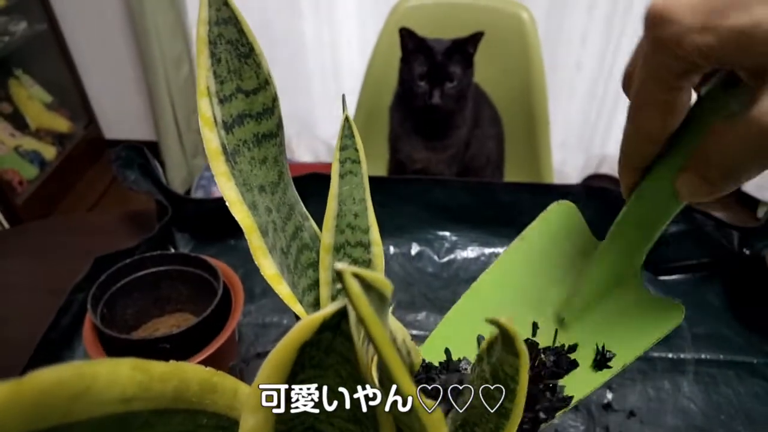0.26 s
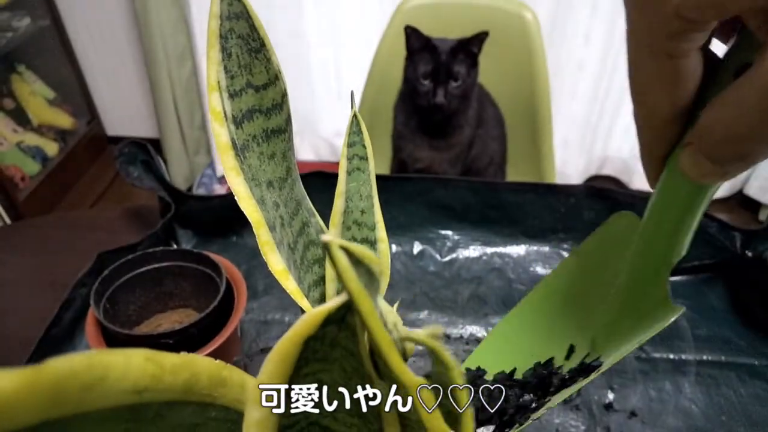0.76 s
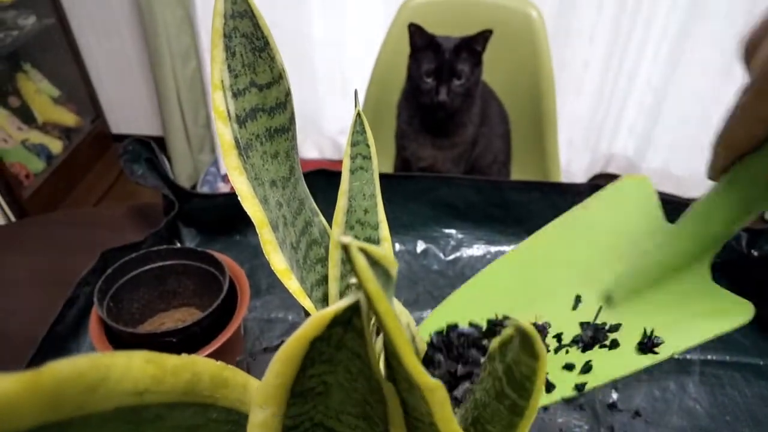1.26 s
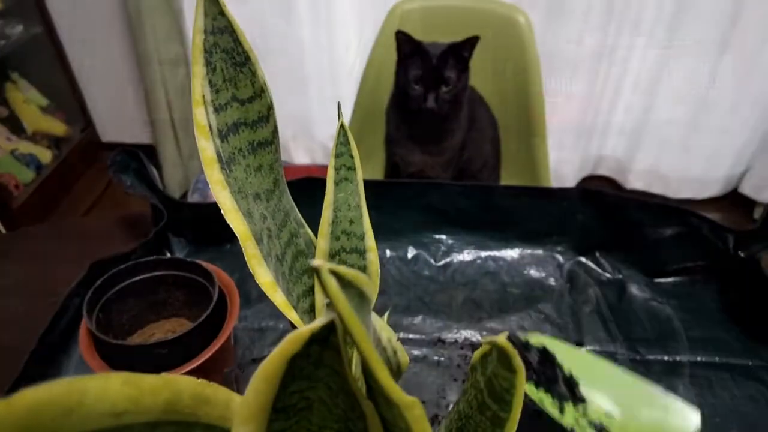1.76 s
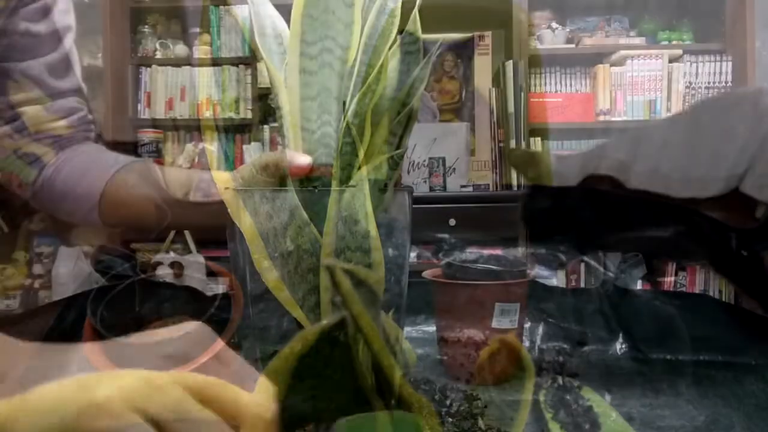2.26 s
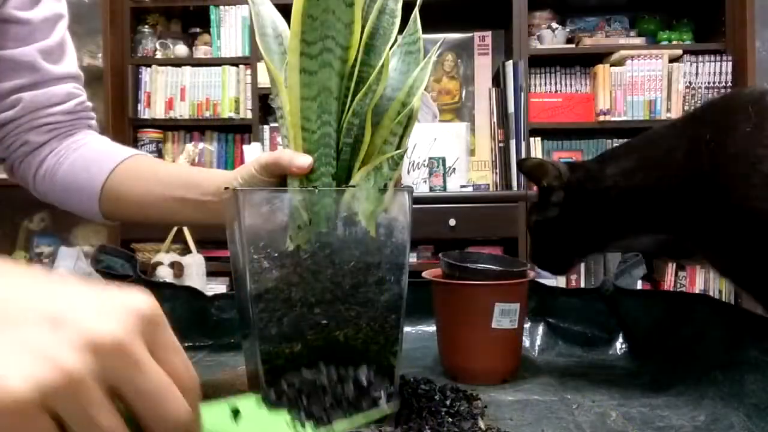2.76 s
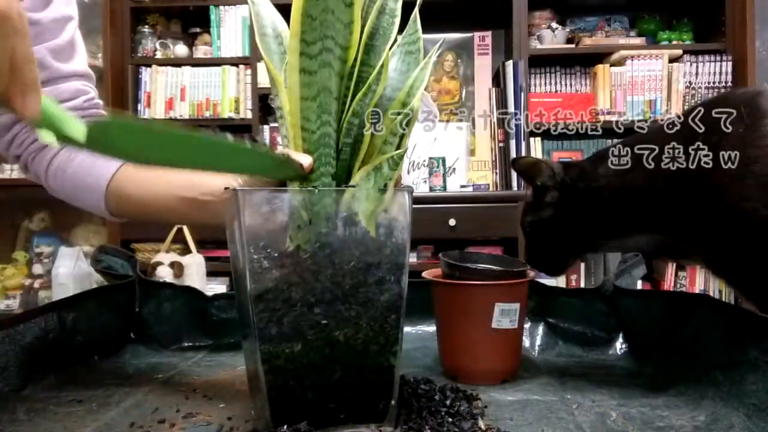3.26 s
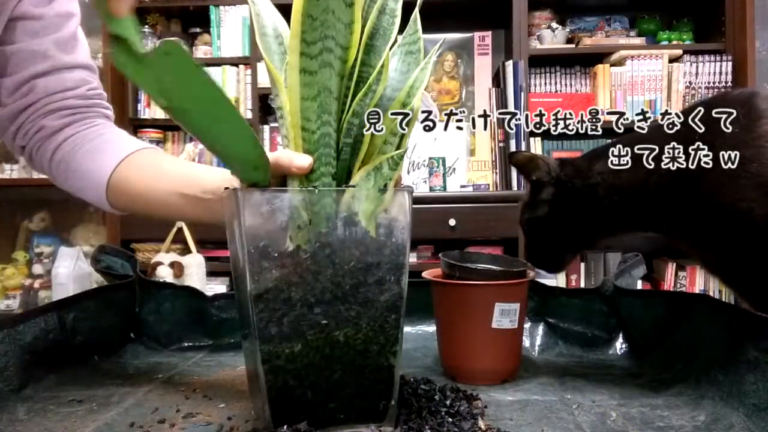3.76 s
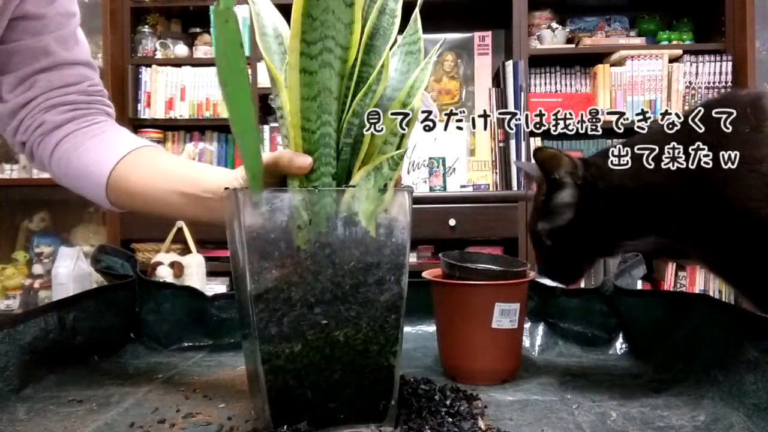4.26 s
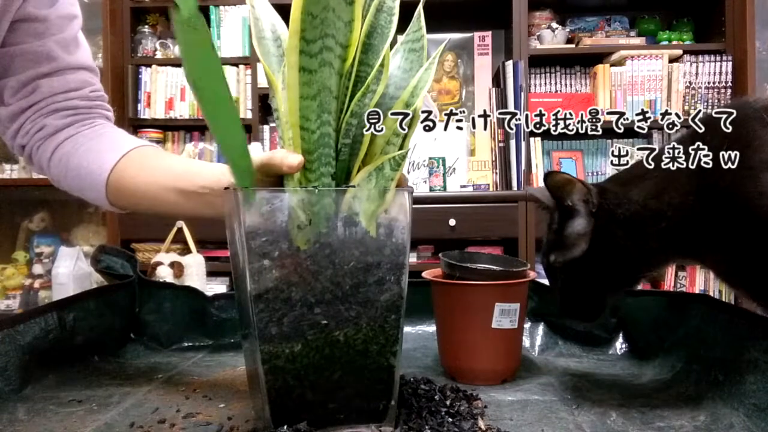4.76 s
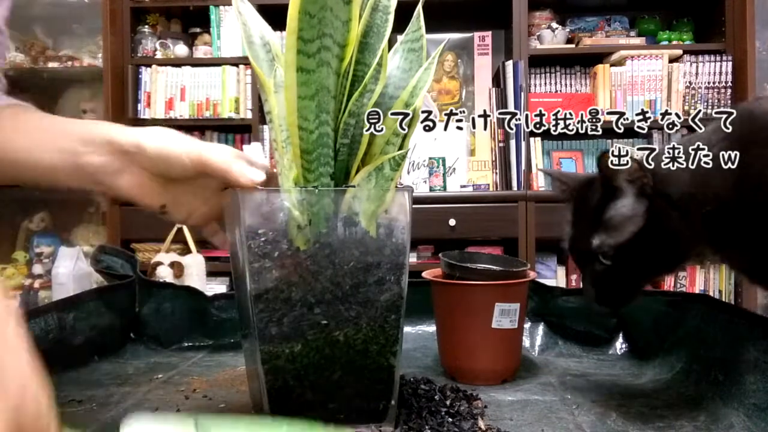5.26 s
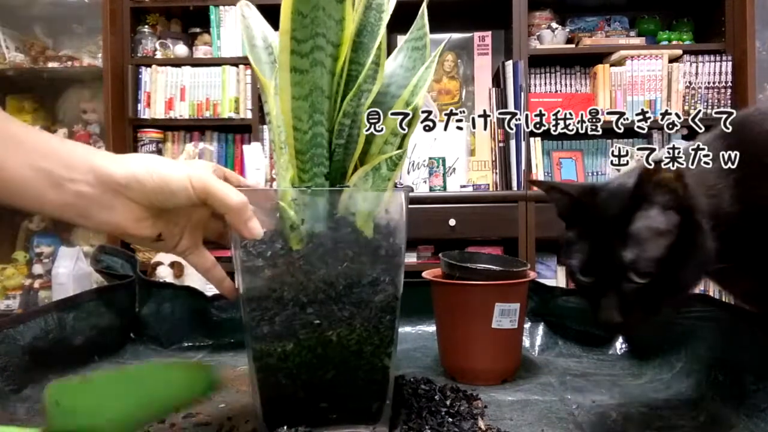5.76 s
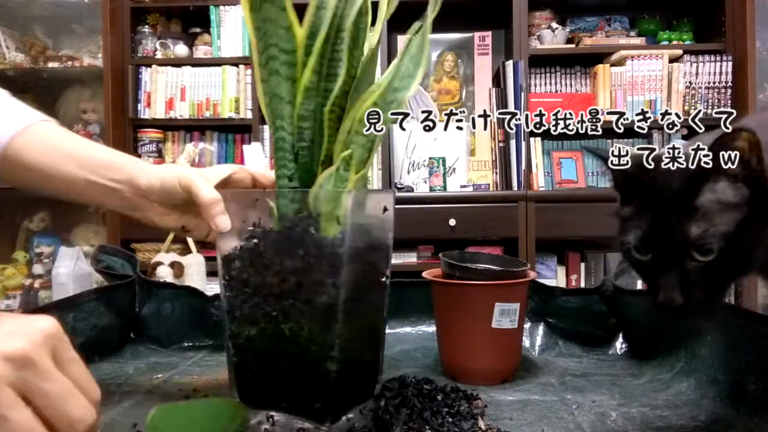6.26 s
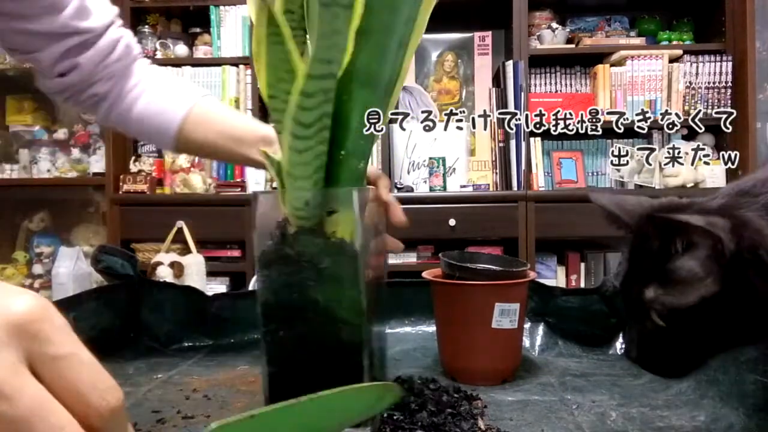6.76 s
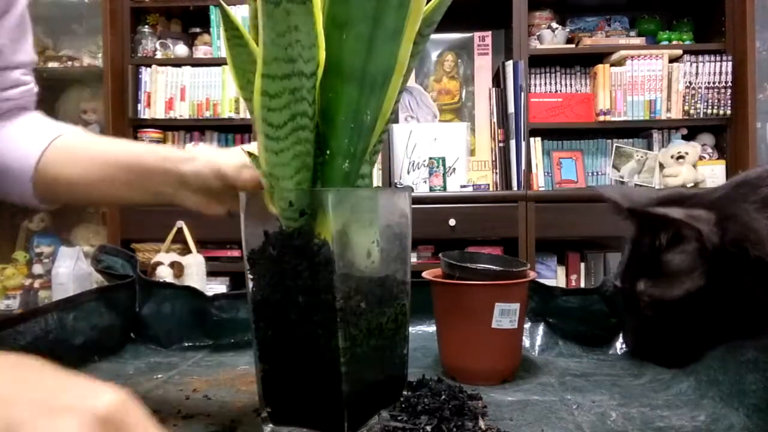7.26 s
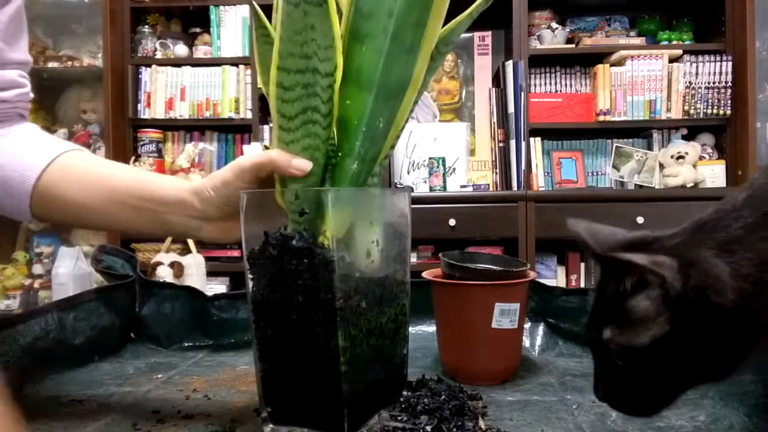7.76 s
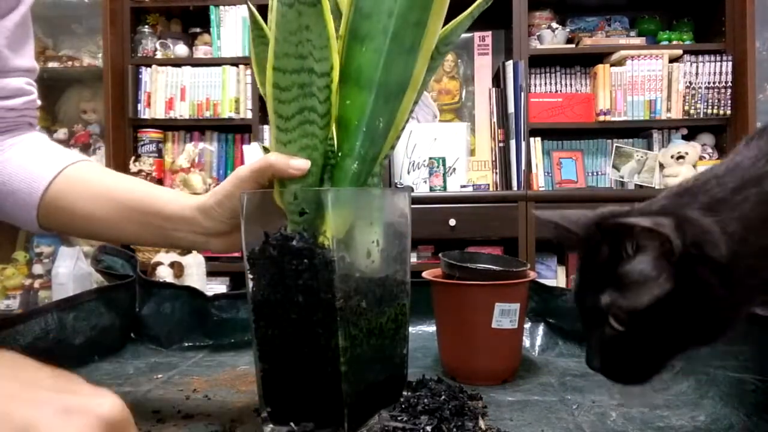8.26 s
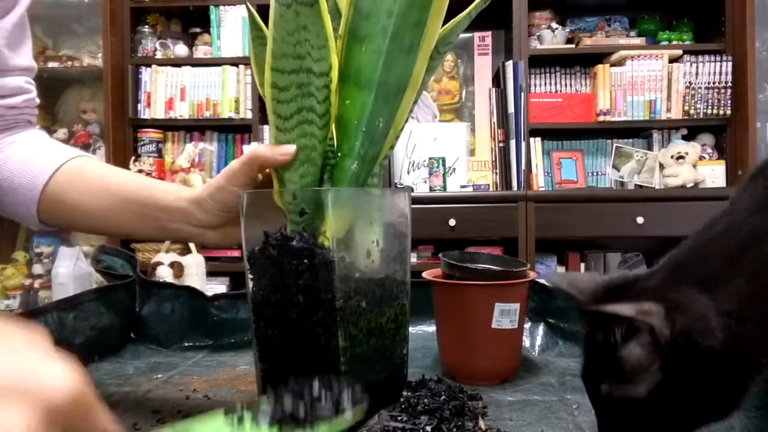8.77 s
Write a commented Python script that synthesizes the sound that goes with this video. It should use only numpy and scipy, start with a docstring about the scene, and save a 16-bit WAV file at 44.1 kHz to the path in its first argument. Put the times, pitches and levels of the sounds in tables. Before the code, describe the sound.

Crunchy soil scooping gives way to hollow pot knocks, a clear trowel tap, a short plastic squeak and gritty scraping over a faint low hum.

```python
"""Gritty potting soil grinds along a trowel scooping it off a plastic sheet into a tall plastic pot.
The blade is tapped clean and rings; the pot knocks down, turns with a squeak and slides over spilt grains.
Soil is a crowd of tiny ringing grains, blows are noise cracks with modal thuds, and gliding tones with
overtones make the groans and squeaks of plastic and a thin ring of the pot wall.
Behind it lie the air of a small quiet room, its short echo and a low wavering appliance hum."""
import sys
import numpy as np
from scipy import signal
from scipy.fft import rfft, irfft
from scipy.io import wavfile

SR = 44100
rng = np.random.default_rng(int(sys.argv[2]) if len(sys.argv) > 2 else 0)


def to_wav(s):
    """Save 16-bit WAV."""
    ch = np.atleast_2d(s).T  # columns
    pcm = np.round(np.clip(ch, -1, 1) * 32767)  # PCM
    wavfile.write(sys.argv[1], SR, pcm.astype(np.int16))


N = 397782
TIME = np.arange(N) / SR
EDGE_HZ = 14500  # upper edge of the recorder's band

# Colour of soil grinding on the blade: (frequency [Hz], relative level [dB])
SOIL_COLOUR = [(90, -6), (180, 5.5), (500, -0.5), (900, -12), (1300, 2), (2000, 2), (3500, 0.5), (5000, 0),
               (7400, -5), (9400, -12.5), (13600, -8), (14500, -37)]
# Colour of grit hissing under the pot: (frequency [Hz], relative level [dB])
HISS_COLOUR = [(590, -53.5), (1000, 0.5), (1500, -2.5), (1910, -0.5), (3100, -2), (4140, 2), (7250, -2),
               (9370, -7), (13400, -4), (14500, -22)]
# Colour of the pot wall's drone: (frequency [Hz], relative level [dB])
DRONE_COLOUR = [(90, -63.5), (160, 9), (250, -16), (350, -6), (480, -0.5), (620, -6), (900, -7.5),
                (1300, -0.5), (2400, -20.5)]
# Colour of the crack in a blow: (frequency [Hz], relative level [dB])
CRACK_COLOUR = [(100, -18), (300, 8.5), (900, 3), (1600, 3), (4200, -0.5), (6500, -3.5), (9500, -10),
                (14000, -6)]
# Colour of the blade scraping the wall: (frequency [Hz], relative level [dB])
SCRAPE_COLOUR = [(90, -13), (170, 16), (300, 4.5), (600, -6), (1000, -4), (2300, -4), (4000, -7.5),
                 (6500, -10.5), (9500, -17.5), (13500, -9.5), (14500, -30)]
# Colour of the room air: (frequency [Hz], relative level [dB])
AIR_COLOUR = [(20, -13), (29, -10), (40, -3.5), (75, 1), (125, -3), (200, -6), (400, -15), (700, -18),
              (2000, -23), (4000, -29), (8000, -34.5), (14000, -33)]
AIR_DB = -54.5  # rms
# Steady lines of the appliance: (frequency [Hz], rms level [dB], unsteadiness [share])
HUM_LINES = [(120.2, -50.5, 0.42), (172.6, -66.5, 0.057), (536, -70.5, 0.32)]
# Decay of the room: (frequency [Hz], t60 [s])
ROOM_DECAY = [(120, 0.35), (400, 0.33), (2000, 0.35), (6000, 0.28), (14000, 0.36)]

# Sharp resonances the grains excite in the blade: (frequency [Hz], width [Hz], gain [dB])
BLADE_RESONANCES = [(918, 95, 20), (3280, 190, -19), (4000, 160, 4.5), (5760, 80, -8), (7130, 85, 7),
                    (7440, 83, 4), (10540, 140, 9.5), (11960, 53, 15), (13400, 160, 10)]
# Sharp resonances of the pot's wall: (frequency [Hz], width [Hz], gain [dB])
WALL_RESONANCES = [(880, 89, 11.2), (1128, 52, 3.4), (1505, 45, 6), (2395, 91, 3.7), (2320, 44, 1.2),
                   (2660, 40, 6), (4100, 120, 3.4), (4500, 170, 3.9), (4780, 70, 5.5), (6140, 77, 2.9),
                   (7400, 61, 5.7), (7590, 22, 18)]
# Resonances of blade and wall pressed together: (frequency [Hz], width [Hz], gain [dB])
SCRAPE_RESONANCES = [(915, 25, 16.5), (1590, 50, 8), (2320, 70, 11.5), (3830, 160, 12), (4078, 54, 15.5),
                     (4720, 99, 9), (6020, 58, 15), (6630, 40, 12), (6930, 74, 12)]
# Modes of the filled pot on the table: (frequency [Hz], relative level [dB], t60 [s])
POT_MODES = [(152, -8.5, 0.077), (159.3, 5, 0.11), (218, -8.5, 0.17), (255.6, 6, 0.083), (314.4, 6, 0.045),
             (343.3, -7, 0.042), (430.6, -2.5, 0.13), (551.4, 8.5, 0.046), (698, 8.5, 0.059)]
# Modes of the trowel: (frequency [Hz], relative level [dB], t60 [s])
BLADE_MODES = [(901, -38, 0.36), (1120, -33, 0.26), (1432, -31.5, 1.22), (1599, -41.5, .25),
               (2048, -32, 0.51), (2280, -36, 0.11), (2320, -18, 0.028), (2490, -43, 0.18),
               (2830, -47, 0.092), (2910, -25.5, 0.027), (3360, -25.5, 0.024), (3850, -29, 0.043),
               (6300, -37, 0.17), (7940, -43, 0.23)]

# Groans and squeaks of slipping plastic, with the pot wall's thin ring near 4 kHz and the octave of
# the groan: (start [s], rise [s], hold [s], release [s], pitch [Hz], level [dB])
PLASTIC_TONES = [(6.226, 0.012, 0.056, 0.1, 4020, -53), (6.301, 0.015, 0.019, 0.073, 442, -34),
                 (6.309, 0.0086, .003, 0.035, 845, -36.5), (6.331, .044, 0.033, 0.027, 1472, -26.5),
                 (6.345, .02, .025, .02, 2440, -44), (6.465, 0.0214, .005, .015, 1487, -50),
                 (8.03, 0.0087, 0.12, 0.047, 352, -45.5), (8.19, 0.049, 0.14, .04, 528, -47),
                 (8.449, 0.029, .008, 0.027, 439, -43.5)]
# Overtones of these tones: (multiple of the pitch, relative level [dB])
PLASTIC_OVERTONES = [(2, -12.5), (3.05, -18.5), (4, -15), (5, -32), (5.4, -19), (6.1, -39), (7.5, -42)]
PITCH_SAG = 0.0121  # a tone goes flat by up to this share as it slackens
# Taps of the trowel; where it is struck decides which modes speak:
# (time [s], relative level [dB], favoured frequency [Hz])
BLADE_TAPS = [(4.05, -23.5, 1070), (4.2247, -18.5, 2720), (4.8101, 3.5, 2170)]
# Blows on pot and table: (time [s], crack level [dB], crack decay [s], brightness [dB/octave],
# thud level [dB], thud centre [Hz])
BLOWS = [(0.719, -20.5, 0.0043, 9.5, -35.5, 400), (2.036, -34, 0.013, 1, -48, 300),
         (2.051, -27, .0076, 0.5, -3, 284), (2.079, -32, .0085, -10, -19, 250),
         (2.1737, -27, 0.0048, -2, -18, 300), (2.291, -33.5, 0.0081, -1.5, -27, 364),
         (2.439, -47.5, .0055, -7, -25.5, 318), (4.051, -48, 0.045, 4.5, -34, 231),
         (4.083, -41, 0.019, -1, -53.5, 240), (4.4878, -21.5, 0.0057, -1.5, -14, 320),
         (4.548, -56, 0.017, -4, -20, 165), (4.636, -40, 0.011, -1, -38, 220),
         (4.8111, -38, .008, 0, -29, 213), (5.9203, -37.5, 0.012, -2.5, -29, 372),
         (6.089, -41, 0.013, -1, -34, 400), (6.224, -25, .0049, 1, -36, 430),
         (6.243, -30, 0.015, -1, -47, 300), (6.643, -41.5, 0.012, -1.5, -40, 440),
         (6.7884, -31, 0.0062, -4.5, -23.5, 280), (6.871, -33, 0.0057, -10, -40, 380),
         (6.921, -33, 0.0053, -2.5, -23.5, 394), (6.985, -26, 0.01, -4, -25.5, 400),
         (7.004, -44, 0.014, -6, -25, 137), (7.4566, -31.5, 0.0048, -6, -33, 427),
         (8.033, -38.5, 0.011, 2, -30, 357), (8.126, -59, .005, -10, -26.5, 304),
         (8.3358, -14, .008, -2.5, -9.5, 275), (8.345, -21.5, 0.0041, -1, -13, 173),
         (8.438, -34.5, 0.0055, 2, -13, 355), (8.568, -35.5, .005, -11, -32, 340)]
# Largest crumbs snapping or landing on blade and sheet: (time [s], starting rms level [dB], pitch [Hz])
BIG_CRUMBS = [(0.087, -40, 2580), (0.165, -48, 885), (0.507, -33, 3540), (0.563, -33, 3470),
              (0.662, -40, 3220), (0.728, -39.5, 494), (0.812, -40, 795), (0.925, -39.5, 880),
              (1.067, -28.5, 3260), (1.099, -30, 3430), (1.16, -31, 3820), (1.19, -32.5, 3200),
              (1.394, -38, 3640), (1.457, -39, 3680), (1.525, -38, 3080), (1.809, -47.5, 3480),
              (2.933, -43, 4580), (3.09, -43, 4350), (3.239, -35.5, 5850), (3.277, -36.5, 10500),
              (4.067, -37, 5000), (4.223, -41.5, 3730), (4.26, -40.5, 2450), (7.414, -50, 1770),
              (8.417, -31.5, 6860), (8.548, -48.5, 2340), (8.648, -46, 5070), (8.874, -38.5, 4830),
              (8.887, -47.5, 1230), (8.953, -39.5, 4240)]
CRUMB_CYCLES = 12.6  # cycles to fall to 1/e, so low crumbs last longer
# Blade pushed down along the inside of the pot: (start [s], rise [s], hold [s], release [s], level [dB])
SCRAPE_PUSHES = [(3.878, 0.051, 0.14, .02, -63.5), (4.04, .015, 0.024, 0.12, -48.5),
                 (4.496, .003, 0.043, 0.04, -33)]
# Pot sliding on the gritty sheet: (start [s], rise [s], hold [s], release [s],
# relative grit hiss level [dB], relative wall drone level [dB], drone centre [Hz])
SLIDES = [(2.039, .005, 0.064, 0.22, -45.5, -46, 286), (2.265, 0.016, 0.14, 0.13, -41.5, -41.5, 385),
          (2.551, .03, 0.084, 0.017, -51.5, -63, 397), (2.684, 0.16, 0.06, 0.072, -47.5, -65, 450),
          (6.08, 0.041, 0.015, 0.032, -51, -39.5, 393), (6.225, 0.0083, 0.058, 0.039, -36.5, -32.5, 450),
          (6.333, 0.031, 0.051, 0.038, -37.5, -48.5, 457), (6.474, 0.016, 0.024, 0.062, -45.5, -58, 497),
          (6.631, 0.015, .13, 0.036, -51, -50, 463), (6.769, 0.012, 0.27, 0.021, -50, -42, 294),
          (7.992, 0.0033, .02, .03, -47, -68, 400), (8.026, 0.006, 0.1, 0.037, -43, -48, 390),
          (8.097, 0.085, 0.11, 0.094, -40, -41, 400)]
DRONE_FOCUS_DB = 3.5  # loss one octave from the drone's centre, growing as octaves squared
# Pushes of the trowel, soil moving on the blade:
# (start [s], rise [s], hold [s], release [s], relative level [dB], added fizz [dB])
SCOOP_PUSHES = [(0.0, 0.0017, 0.0088, 0.34, -48, -7), (0.23, .11, 0.44, 0.09, -39.5, -1),
                (0.845, 0.081, 0.25, 0.26, -41, 1), (2.525, 0.087, .025, .012, -59.5, 19),
                (3.006, 0.13, .25, 0.027, -55, -7), (7.373, 0.047, 0.23, 0.048, -55, -35),
                (8.51, 0.03, 0.22, 0.061, -46.5, -2), (8.832, .02, 0.12, 0.053, -48.5, -7)]


def amp(db):
    """Decibels to gain."""
    return 10 ** (np.asarray(db) / 20)


def unit(x):
    """Scales to rms 1."""
    return x / np.sqrt(np.mean(x ** 2) + 1e-20)


def read(points, hz):
    """Reads a table along log frequency."""
    f, value = np.transpose(points)
    return np.interp(np.log(hz + 1), np.log(f), value)


def add(mix, s, sound):
    """Mixes a sound in at time s."""
    part = mix[max(round(s * SR), 0):][:len(sound)]
    part += sound[:len(part)]


def colour(x, db_at):
    """Causal minimum-phase filter whose gain in dB is a function of frequency."""
    hz = abs(np.fft.fftfreq(4096, 1 / SR))
    log_gain = np.log(amp(np.maximum(db_at(hz), -100)))
    taps = np.fft.ifft(np.exp(np.conj(signal.hilbert(log_gain)))).real
    return signal.fftconvolve(x, taps)[:len(x)]


def peaks_db(peaks, hz):
    """The gain of a set of narrow resonances."""
    return sum(db / (1 + (2 * (hz - f) / width) ** 2) for f, width, db in peaks)


def waver(rate_hz):
    """Slow random motion of rms 1."""
    hz = np.fft.rfftfreq(N, 1 / SR)
    return unit(irfft(rfft(rng.standard_normal(N)) / (1 + (hz / rate_hz) ** 4), N))


def swell(start, rise, hold, release):
    """One push of the hand: it builds, holds and dies away exponentially."""
    t = TIME - start
    build = np.clip(t / max(rise, 1e-3), 0, 1)
    return build * np.exp(-np.clip((t - rise - hold) / max(release, 1e-3), 0, 20))


def joined(gains):
    """Overlapping pushes add in power."""
    return np.sqrt(sum(gain ** 2 for gain in gains))


def clicks(per_s, spread_db):
    """Random contacts of either sign, their sizes spread exponentially in dB."""
    hit = np.flatnonzero(rng.random(N) < per_s / SR)
    sign, size = rng.choice([-1., 1.], N), rng.exponential(1, N)
    out = np.zeros(N)
    out[hit] = sign[hit] * amp(spread_db * np.minimum(size[hit], 4))
    return unit(out)


def grains(per_s, spread_db, cycles, clump_db, sharp, patch_db=5.0, count=18):
    """Crumbs of all sizes each ring a few cycles, among sharp fractures; they give way in clumps."""
    t, rings = np.arange(600) / SR, np.zeros(N)
    moments = np.arange(0, N / SR, .015)
    for hz in np.geomspace(400, 14000, count):
        ring = np.sin(2 * np.pi * hz * t) * np.exp(-hz * t / cycles)
        # each size comes and goes
        patches = np.interp(TIME, moments, amp(patch_db * rng.standard_normal(len(moments))))
        contacts = patches * clicks(per_s / count, spread_db)
        rings += np.sqrt(hz) * unit(signal.oaconvolve(contacts, ring)[:N])
    fractures = sharp * clicks(per_s / 2, spread_db)
    return (unit(rings) + fractures) * amp(clump_db * waver(50))


def crumb(hz, skirt_db=3.0, narrow=5.1):
    """A crumb breaks in a short crackle around its own pitch."""
    t = np.arange(SR // 6) / SR
    noise = rng.standard_normal(len(t))
    crackle = colour(noise, lambda f: -skirt_db * np.log2(1 + (narrow * np.log2((f + 1) / hz)) ** 2))
    return unit(crackle) * np.exp(-t * hz / CRUMB_CYCLES)


def background():
    """Coloured noise for room air, and appliance lines that waver in strength and phase."""
    bed = amp(AIR_DB) * unit(colour(rng.standard_normal(N), lambda hz: read(AIR_COLOUR, hz)))
    for hz, db, unsteady in HUM_LINES:
        swing = 1 + unsteady * (waver(11) + 1j * waver(14))
        bed += amp(db) * unit((swing * np.exp(2j * np.pi * hz * TIME)).real)
    return bed


def room(x):
    """Dense reflections from table and shelves, each band dying at its own speed."""
    size = SR // 2
    present = (rng.random(size) < 3000 / SR) * (TIME[:size] > .004)
    taps = rng.choice([-1., 1.], size) * present
    hz, t, bands = signal.stft(taps, SR, nperseg=256)
    fade = amp(-60 * t / read(ROOM_DECAY, hz)[:, None])
    tail = signal.istft(bands * fade, SR, nperseg=256)[1]
    return signal.fftconvolve(x, tail / np.linalg.norm(tail))[:N]


def plastic_tones(jitter=0.0067, flutter_db=2.14, rasp_db=-16, firm_db=-26, edge=0.39):
    """Uneven groans, squeaks and wall ring; a louder tone has more rasp and wall-coloured overtones."""
    out, drift, flutter = np.zeros(N), 1 + jitter * waver(280), flutter_db * waver(150)
    noise = rng.standard_normal(N)
    rasp = unit(colour(noise, lambda hz: read(HISS_COLOUR, hz) + peaks_db(WALL_RESONANCES, hz)))
    rasp *= amp(rasp_db)
    for *shape, hz, db in PLASTIC_TONES:
        grip = swell(*shape) ** 2  # a tone grows as the square of the push
        on = grip > .005
        level_db = db + 20 * np.log10(grip[on])
        pitch = hz * (1 - PITCH_SAG * (1 - grip[on])) * drift[on]
        phase = 2 * np.pi * np.cumsum(pitch) / SR
        overtones = sum(amp(tone_db + peaks_db(WALL_RESONANCES, k * hz)) * np.sin(k * phase)
                        for k, tone_db in PLASTIC_OVERTONES if k * hz < EDGE_HZ)
        firmness = amp(edge * (level_db - firm_db))
        tone = np.sin(phase) + firmness * (overtones + rasp[on] * (1 + np.cos(phase)))
        out[on] += np.sqrt(2) * tone * amp(level_db + flutter[on])
    return out


def trowel(spread_db=5, hold_s=.22, muffle_db=12):
    """The tapped blade's modes ring until the hand muffles them; returns the ring and its attack."""
    ring, attack, t = np.zeros(N), np.zeros(N), np.arange(SR) / SR
    hz, mode_db, t60 = np.transpose(BLADE_MODES)[:, :, None]
    muffled_db = muffle_db * np.clip((t - hold_s) / 0.091, 0, 1)
    for s, db, favoured_hz in BLADE_TAPS:
        level_db = db + mode_db - spread_db * np.log2(hz / favoured_hz) ** 2
        modes = amp(level_db - 60 * t / t60 - muffled_db) * np.sin(2 * np.pi * hz * t)
        note = modes.sum(0)
        add(ring, s, note)
        add(attack, s, note * np.exp(-t / 0.0015))
    return ring, attack


def knocks():
    """Each blow is a gritty crack and a thud; softer contact favours the pot's lower modes."""
    cracks, thuds, t = np.zeros(N), np.zeros(N), np.arange(SR // 3) / SR
    hz, mode_db, t60 = np.transpose(POT_MODES)[:, :, None]
    for s, crack_db, decay, bright, thud_db, centre_hz in BLOWS:
        def crack_colour(f):
            tilt_db = bright * np.log2((f + 300) / 2000)
            return read(CRACK_COLOUR, f) + peaks_db(WALL_RESONANCES, f) + tilt_db
        crack = unit(colour(rng.standard_normal(len(t)), crack_colour))
        add(cracks, s, amp(crack_db) * crack * np.exp(-t / max(decay, 1e-4)))
        weight = amp(mode_db - 11.6 * np.log2(hz / centre_hz) ** 2)
        modes = weight * amp(-60 * t / t60) * np.sin(2 * np.pi * hz * t)
        thud = modes.sum(0) / np.linalg.norm(weight)
        add(thuds, s, amp(thud_db) * thud * (1 - np.exp(-t / 0.0032)))  # soft onset
    return cracks, thuds


def crumbs():
    """The large crumbs that stand out from the grit, each a short pitched crackle."""
    out = np.zeros(N)
    for s, db, hz in BIG_CRUMBS:
        add(out, s, amp(db) * crumb(hz))
    return out


def scraping():
    """Grit trapped between blade and wall rasps and sets both ringing."""
    grit = grains(per_s=6300, spread_db=3.5, cycles=0.95, clump_db=1.0, sharp=1.0, patch_db=3.5, count=8)
    rasp = unit(colour(grit, lambda hz: read(SCRAPE_COLOUR, hz) + peaks_db(SCRAPE_RESONANCES, hz)))
    return rasp * joined(amp(db) * swell(*shape) for *shape, db in SCRAPE_PUSHES)


def sliding(hiss_db=-4.5, drone_db=-3):
    """Grains crush against the pot, and its judder sets the wall droning."""
    grit = grains(per_s=6000, spread_db=-4.0, cycles=1.75, clump_db=1.0, sharp=0.75)
    hiss = unit(colour(grit, lambda hz: read(HISS_COLOUR, hz) + peaks_db(WALL_RESONANCES, hz)))
    body_peaks = [(hz, 3.3 / t60, 6) for hz, db, t60 in POT_MODES]  # faster decay, wider peak
    judder = clicks(per_s=700, spread_db=3.5)
    wall = colour(judder, lambda hz: read(DRONE_COLOUR, hz) + peaks_db(body_peaks, hz))
    drone, hiss_gains = np.zeros(N), []
    for *shape, grit_db, wall_db, centre_hz in SLIDES:
        push = swell(*shape)
        voiced = unit(colour(wall, lambda hz: -DRONE_FOCUS_DB * np.log2((hz + 1) / centre_hz) ** 2))
        drone += amp(wall_db + drone_db) * push * voiced
        hiss_gains.append(amp(grit_db + hiss_db) * push)
    return hiss * joined(hiss_gains) + drone


def scooping(coarse_db=-7.5, fizz_db=-2.0, fizz_power=1.7, lump_db=-13.0, lump_hz=3300,
             pellet_db=-19.5, pellet_hz=800):
    """Soil grinds along the blade; a firm push adds fizz, stray lumps snap and pellets knock."""
    grit = grains(per_s=3000, spread_db=-2.5, cycles=2.5, clump_db=3.0, sharp=0.98, count=24)
    grit = unit(colour(grit, lambda hz: read(SOIL_COLOUR, hz) + peaks_db(BLADE_RESONANCES, hz)))
    fizz = signal.sosfiltfilt(signal.butter(2, 7500, "high", fs=SR, output="sos"), grit)
    lumps = unit(signal.oaconvolve(clicks(per_s=110, spread_db=5.0), crumb(lump_hz))[:N])
    pellets = unit(signal.oaconvolve(clicks(per_s=23, spread_db=3.0), crumb(pellet_hz))[:N])
    push = joined(amp(db) * swell(*shape) for *shape, db, bright in SCOOP_PUSHES)
    # fizz rises more steeply than the push itself
    firm = joined(amp(db + bright) * swell(*shape) ** fizz_power for *shape, db, bright in SCOOP_PUSHES)
    body = amp(coarse_db) * (grit - fizz) + amp(lump_db) * lumps + amp(pellet_db) * pellets
    return body * push + amp(fizz_db) * fizz * firm


def scene():
    """All sources on the table, with the room behind them."""
    plastic = plastic_tones()
    ring, attack = trowel()
    cracks, thuds = knocks()
    soil = crumbs() + scraping() + sliding() + scooping()
    sends = amp(-8.5) * soil + amp(-7.5) * cracks + amp(-8) * thuds
    sends += amp(-3.5) * attack + amp(-26) * plastic  # only the ring's attack feeds the room
    return (background() + room(sends) + plastic + ring + cracks + thuds + soil)[None]


def record(dry):
    """The recorder's band limit, a steep linear-phase low-pass."""
    low_pass = signal.firwin(401, EDGE_HZ, window=("kaiser", 8), fs=SR)
    return signal.oaconvolve(dry, low_pass[None], "same")


dry = scene()
out = record(dry)
to_wav(out)
```